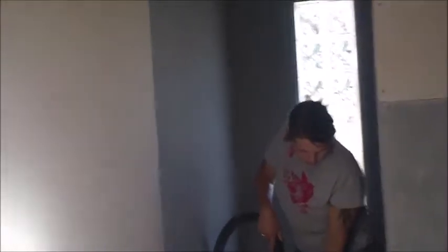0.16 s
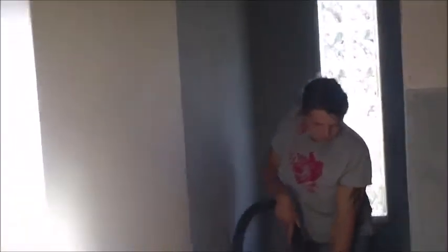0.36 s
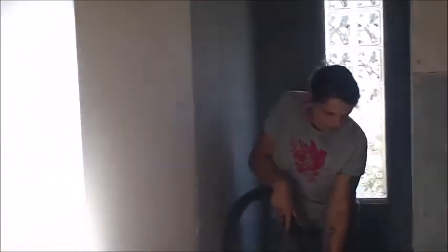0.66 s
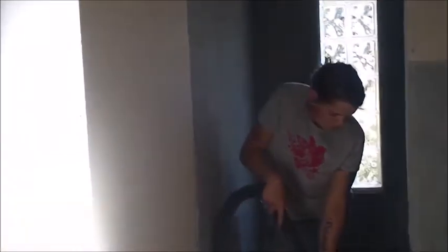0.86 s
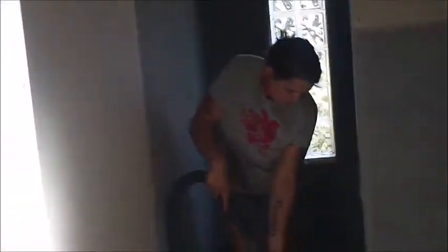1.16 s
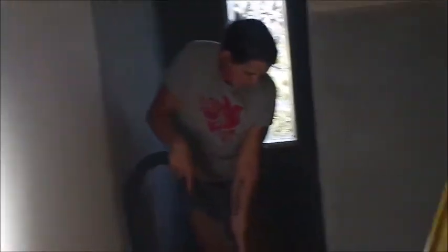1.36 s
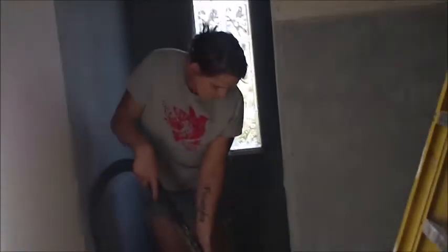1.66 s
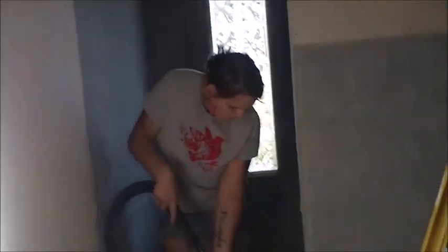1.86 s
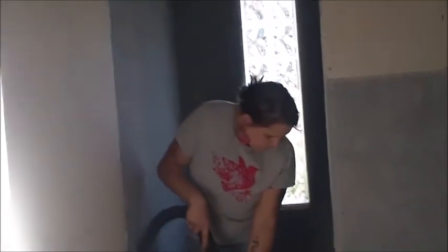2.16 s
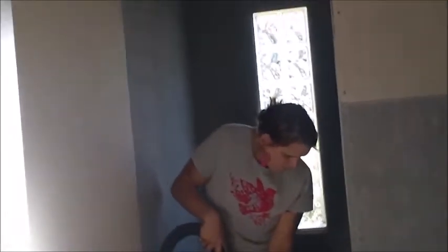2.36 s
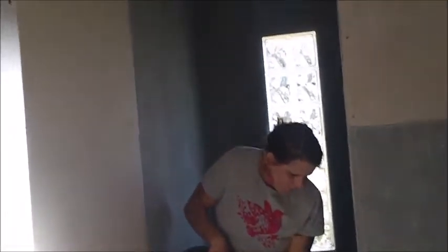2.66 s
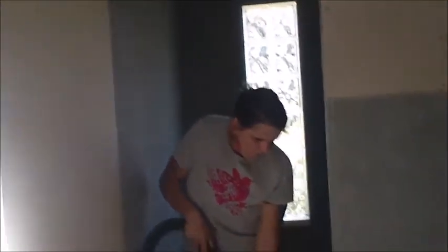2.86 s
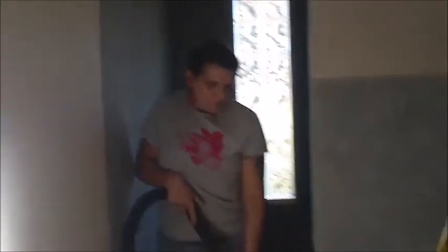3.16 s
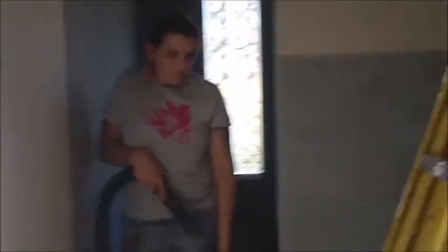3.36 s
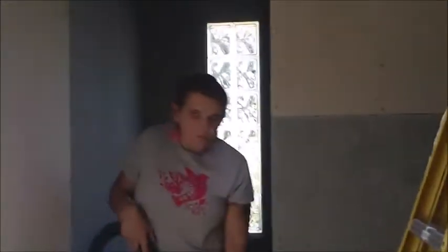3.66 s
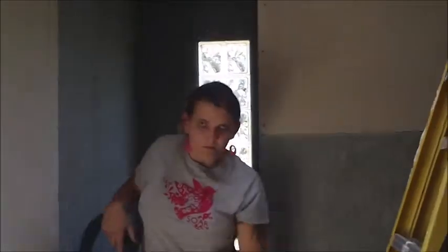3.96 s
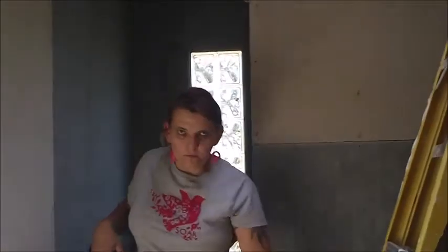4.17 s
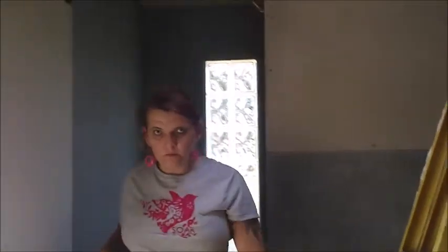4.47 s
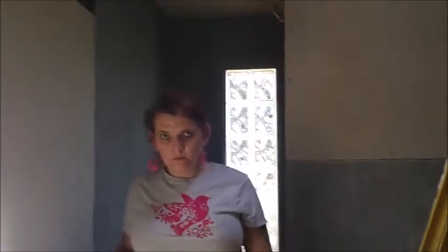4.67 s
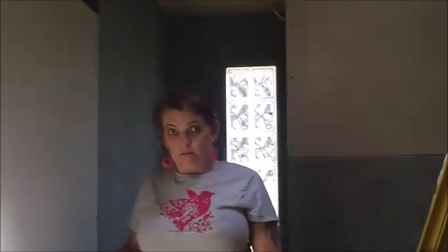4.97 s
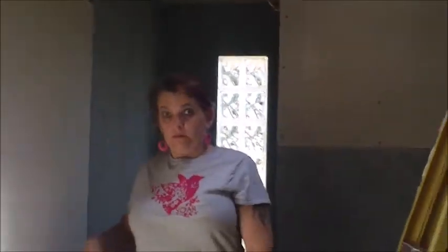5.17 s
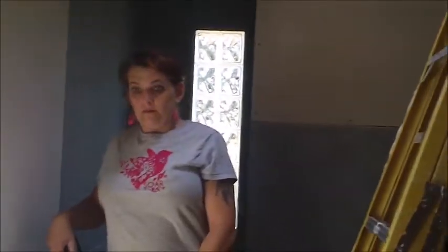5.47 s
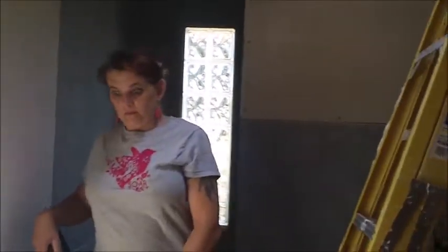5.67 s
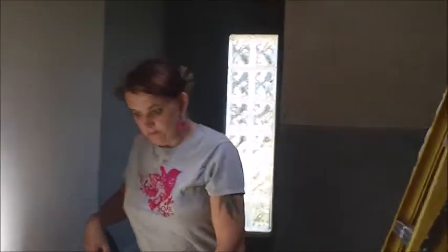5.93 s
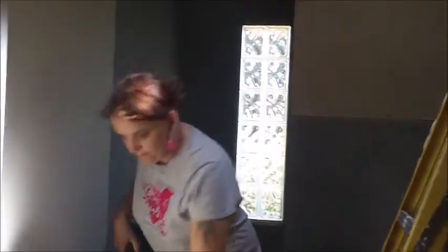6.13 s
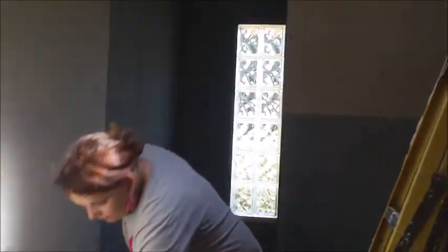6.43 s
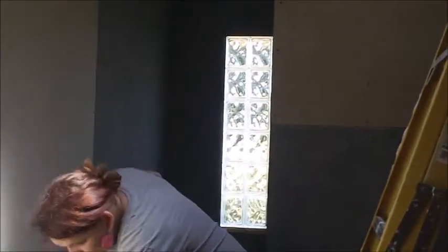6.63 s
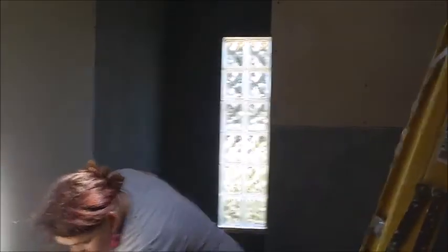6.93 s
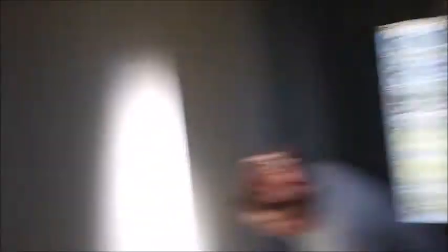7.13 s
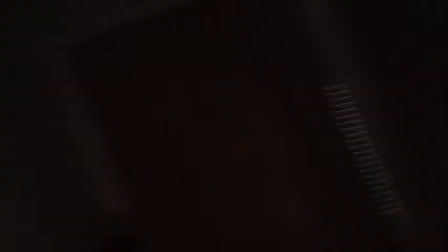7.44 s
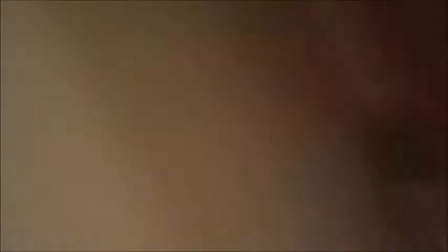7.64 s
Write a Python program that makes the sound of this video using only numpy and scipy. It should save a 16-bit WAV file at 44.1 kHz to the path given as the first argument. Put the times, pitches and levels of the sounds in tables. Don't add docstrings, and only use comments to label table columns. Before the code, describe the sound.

A canister vacuum cleaner runs in a bare, hard-walled room, heard close on a handheld microphone that moves around. A steady singing whine stays at one pitch, wavering in loudness, over roaring, hissing air. A sharp grit knock cracks in the hose midway. Near seven seconds the motor is switched off and the whine slides down, swelling and dipping, while air still rushes.

```python
import sys
import numpy as np
from scipy import signal
from scipy.fft import rfft, irfft, next_fast_len
from scipy.io import wavfile
from scipy.ndimage import uniform_filter1d, map_coordinates

SR = 44100
rng = np.random.default_rng(int(sys.argv[2]) if len(sys.argv) > 2 else 0)


def transcribe(signal):
    frames = np.atleast_2d(signal).T
    limited = np.clip(frames, -1, 1)
    pcm = np.round(limited * 32767).astype(np.int16)
    wavfile.write(sys.argv[1], SR, pcm)


def volts(x):
    e = np.asarray(x, float) / 20
    return 10 ** e


N = 343980

# time_s, level_db
SHAFT_TONE = [(0, -11.5), (.27, -15.5), (.44, -28), (.57, -22.5), (.68, -29), (.86, -15), (1.08, -10.5),
              (2.0, -11), (2.34, -12.5), (3.2, -14), (3.65, -10.5), (3.87, -10.5), (4.21, -12.5),
              (4.55, -10.5), (5.24, -9), (5.46, -9.5), (5.9, -8.6), (6.85, -8.4)]
# swell_s, swell_db, since_null_s, null_db
CROSSED = [(6.941, -7.5, 0.014, -26), (6.975, -13, 0.012, -17.0), (7.026, -13, 0.03, -39),
           (7.097, -9, 0.057, -23.5), (7.135, -12, 0.008, -16), (7.165, -14.5, 0.0089, -32),
           (7.211, -14, 0.037, -36), (7.291, -7.5, 0.044, -22), (7.328, -9.0, 0.026, -15),
           (7.391, -11.5, 0.028, -23), (7.44, -12.5, 0.031, -35), (7.52, -18.5, 0.034, -30),
           (7.581, -16, 0.047, -34), (7.635, -19, 0.032, -35), (7.708, -14.0, 0.066, -25)]
# time_s, level_db
LAST_SWELLS = [
    (7.743, -18),
    (7.79, -11.5),
    (7.81, -8),
]
# order (multiple of the shaft tone), level_db
FAINT_ORDERS = [(6, -51), (14, -53), (21, -63)]
# centre_s, length_s, level_db
SECOND = [(.65, .5, -30), (2.2, 1, -33), (3.0, .5, -32), (3.85, .5, -30.5), (4.4, 0.43, -23),
          (5.0, 0.76, -33), (6.65, 0.55, -43)]
THIRD = [(.1, 0.58, -29), (.48, .3, -32), (1.2, 1.1, -34), (2.6, 0.95, -35), (3.6, 0.64, -42),
         (4.45, 0.74, -31.5), (5.15, 0.67, -38.5), (6.3, .5, -41)]
FOURTH = [(.95, 0.44, -45), (3.1, .7, -45), (4.3, .8, -36), (5.4, 1.0, -44), (6.7, .4, -51)]
FIFTH = [(.7, 0.76, -35), (1.7, .8, -50), (2.7, 0.99, -42), (3.45, 0.32, -38), (4.05, 0.54, -43),
         (5.1, 0.94, -48)]
BLADES = [(.62, .25, -33.5), (1.15, 0.59, -43), (1.72, 0.87, -34), (2.72, 0.48, -35), (4.37, 0.38, -36.5),
          (5.55, 0.43, -40), (6.05, 0.21, -44), (6.7, 0.28, -50)]
# centre_s, length_s, level_db
GLIDES = [
    [(7.1, .3, -34), (7.27, .15, -42)],
    [(7.133, 0.34, -33.5)],
    [(7.2, .1, -35), (7.33, .12, -41), (7.47, .13, -35), (7.61, .13, -36)],
]

# freq_hz, density_db (per Hz)
ROAR = [(400, -16.5), (470, -6), (560, -6), (720, -5.5), (850, 3), (1070, -4), (1450, -5), (1600, -14),
        (1900, -43)]
THROAT = [(1400, -17), (1600, -3), (2200, -2), (2700, -6.5), (3300, -6), (3900, -10), (4300, -44)]
HISS = [(3200, -27), (3900, -5.5), (4600, -1.5), (5300, -1.5), (6200, -1.5), (7200, -2.5), (8000, -3.5),
        (8400, -55)]
FIZZ = [(7600, -32), (8000, -2), (9200, -2), (10500, -4.5), (11200, -11), (11600, -42)]
SPRAY = [(10800, -32), (11200, -1.5), (12000, -2.5), (13500, -5.5), (15500, -6)]
NOZZLE = [(4300, -30), (4600, -4), (4950, -24), (5400, -11), (5750, 1), (6100, -5), (6500, -28)]
# freq_hz, density_db (per Hz)
BOOM = [(180, -29), (215, -6), (270, -4), (330, -8.5), (440, -10), (520, -3)]
RUMBLE = [(18, -42), (35, -20), (70, -22), (120, -10.5), (190, -4), (230, -18)]
# freq_hz, width_hz, lift_db
HOSE = [(175, 29, 5.5), (246.5, 29, 10.5), (275.6, 13, 9), (363, 52, 7), (390, 24, 2.5), (723.7, 42, 9),
        (850, 67, -3.5), (1398, 75, 8), (1667, 20, 4), (2690, 49, 7)]
# time_s, level_db
AIR_LEVEL = [(.1, -25.5), (.37, -21), (.79, -20), (.88, -22.5), (1.15, -25.5), (1.75, -26), (2.35, -24),
             (2.5, -22.5), (3.3, -23), (3.6, -25), (3.95, -24), (4.25, -23), (4.6, -26.5), (5.1, -27.5),
             (5.55, -28), (5.95, -30.5), (6.9, -30), (7.8, -29)]

# start_s, peak_db, ring_hz, t60_s
KNOCKS = [
    (3.8631, -2, 850, .005),
    (3.8631, -9, 2000, .008),
    (7.6545, -7, 1220, .016),
    (7.6545, -16, 1800, .008),
]
# centre_s, length_s, centre_hz, width_hz, level_db
BRUSH = [
    (7.398, 0.058, 10300, 5000, -29.5),
    (7.585, .06, 10400, 500, -37),
    (7.769, 0.069, 10300, 700, -41),
    (.32, .06, 60, 80, -50),
    (3.178, 0.1, 110, 80, -44),
    (4.43, .04, 60, 100, -42),
    (5.727, 0.085, 90, 60, -49),
    (7.498, 0.058, 70, 80, -47),
    (7.659, .05, 90, 100, -48),
]

# start_s, depth_db, recovery_s
DUCKS = [
    (2.025, -2, .1),
    (2.53, -1.5, .15),
    (3.864, -4, .2),
    (4.35, -3, .04),
]
# freq_hz, width_hz
NOTCHES = [(7881, 680), (10960, 340)]
# centre_s, above_hz, depth_db
DROPOUTS = [
    (1.167, 2700, -20),
    (2.106, 1600, -24),
    (3.38, 1600, -22),
    (4.367, 2500, -22),
    (4.409, 2500, -22),
    (4.473, 2500, -18),
    (5.772, 1500, -24),
]
# centre_s, centre_hz
REFILLED = [(.26, 5200), (.261, 11700), (.354, 11000), (.422, 9000), (.679, 9650), (.958, 13050),
            (1.329, 9600), (1.422, 12900), (1.514, 10700), (1.747, 5150), (2.142, 9000), (2.374, 7500),
            (2.699, 9600), (2.768, 6300), (2.769, 11750), (2.885, 10350), (3.187, 14400), (3.698, 8950),
            (4.975, 10250), (5.23, 9000), (5.439, 4900), (5.439, 8400), (5.67, 14100), (5.671, 11750),
            (5.88, 4900), (6.02, 13050), (6.693, 8300), (6.693, 5200), (6.738, 13350), (7.367, 4900)]

RUN_HZ, OFF_S, COAST_S = 496.85, 6.887, 2.2
QUIET_DB, GLIDE_DB = -48, -53
MEAN_AIR_DB = -26
LIFT_S, LIFT_DB = 5.25, -9
# level_db at mean air level, db per db of air level, db per halving of speed
ROAR_LAW, THROAT_LAW, HISS_LAW = (-23.5, 1.04, -1.3), (-30.5, 1.2, 5.1), (-28.5, 0.93, -2.8)
FIZZ_LAW, SPRAY_LAW = (-33.5, 0.85, -2.2), (-38.5, 1, -7)
DRUM_LAW, FLOOR_LAW = (-30, 1, -2.7), (-45, 1.35, -7)


def unit(x):
    return x / np.sqrt(np.mean(x ** 2) + 1e-20)


def along(points, hz):
    f, v = np.transpose(points)
    return np.interp(np.log(hz + 1), np.log(f + 1), v, left=-120, right=-120)


def curves(rows):
    s, *cols = np.transpose(rows)
    return [np.interp(np.arange(N) / SR, s, c) for c in cols]


def wobble(rate):
    coarse = np.arange(0, N + 64, 64)
    knots = rng.standard_normal(int(N * rate / SR) + 4)
    return np.interp(np.arange(N), coarse, map_coordinates(knots, [coarse * rate / SR]))


def filtered(x, response):
    m = next_fast_len(x.shape[-1] + 8192)
    spectrum = rfft(x, m) * response(np.fft.rfftfreq(m, 1 / SR))
    return irfft(spectrum, m)[..., :x.shape[-1]]


def span(s, length):
    first = max(round((s - length / 2) * SR), 0)
    window = np.hanning(round(length * SR))[:N - first]
    return slice(first, first + len(window)), window


def patched(x, depth_db, size, tall, long):
    z = signal.stft(x, nperseg=size)[2]
    field = uniform_filter1d(rng.standard_normal(z.shape), tall, axis=0)
    field = uniform_filter1d(field, long, axis=1)
    return signal.istft(z * volts(depth_db * unit(field)), nperseg=size)[1][:N]


def room(x, t60):
    t = np.arange(SR // 2) / SR
    tail = rng.standard_normal(len(t)) * volts(-60 * t / t60)
    return signal.fftconvolve(x, tail / np.linalg.norm(tail))[:N]


def speed():
    since = np.arange(N) / SR - OFF_S
    hz = RUN_HZ / (1 + np.clip(since, 0, None) / COAST_S) ** 2
    return uniform_filter1d(hz, size=1500), since < 0


def follows(law):
    db, per_level, per_halving = law
    halvings = np.log2(RUN_HZ / speed()[0])
    return db + per_level * (curves(AIR_LEVEL)[0] - MEAN_AIR_DB) + per_halving * halvings


def rush(spectrum, patchy_db):
    noise = patched(rng.standard_normal(N), patchy_db, size=512, tall=6, long=10)

    def response(f):
        lift_db = sum(db / (1 + (2 * (f - hz) / width) ** 2) for hz, width, db in HOSE)
        return volts(along(spectrum, f) + lift_db)

    return unit(filtered(noise, response))


def drum():
    boom = volts(follows(DRUM_LAW) + 0.42 * wobble(5)) * rush(BOOM, patchy_db=0.4)
    rumble = volts(follows(FLOOR_LAW) + 0.66 * wobble(5)) * rush(RUMBLE, patchy_db=0.5)
    return boom + rumble


def air():
    flutter = 0.5 * wobble(16) + 0.64 * wobble(45)
    roar = volts(follows(ROAR_LAW) + 0.4 * wobble(16)) * rush(ROAR, patchy_db=0.37)
    throat = volts(follows(THROAT_LAW) + 0.63 * flutter) * rush(THROAT, patchy_db=0.6)
    hiss = volts(follows(HISS_LAW) + 1.1 * flutter) * rush(HISS, patchy_db=0.58)
    fizz = volts(follows(FIZZ_LAW) + 0.57 * flutter) * rush(FIZZ, patchy_db=0.84)
    spray = volts(follows(SPRAY_LAW) + 1.0 * flutter) * rush(SPRAY, patchy_db=0.5)
    return roar + throat + hiss + fizz + spray


def nozzle():
    lifted = np.clip((np.arange(N) / SR - LIFT_S) / 0.15, 0, 1)
    level_db = follows(HISS_LAW) + LIFT_DB + 1.5 * wobble(3)
    return lifted * volts(level_db) * rush(NOZZLE, patchy_db=2.5)


def grit():
    out, t = np.zeros(N), np.arange(SR // 40) / SR
    for s, db, hz, t60 in KNOCKS:
        out[round(s * SR):][:len(t)] += volts(db - 60 * t / t60) * np.sin(2 * np.pi * hz * t)
    return signal.sosfilt(signal.butter(2, 250, "high", fs=SR, output="sos"), out)


def fingers():
    out = np.zeros(N)
    for s, length, hz, width, db in BRUSH:
        where, window = span(s, length)
        noise = rng.standard_normal(len(window))
        band = filtered(noise, lambda f: np.exp(-(2 * (f - hz) / width) ** 2))
        out[where] += volts(db) * window * unit(band)
    return out


def zones(rows, quiet_db):
    t = np.arange(0, N / SR, 0.01)
    swells = sum(volts(db) * np.exp(-(2 * (t - s) / length) ** 2) for s, length, db in rows)
    gain = volts(quiet_db) + swells
    return curves(np.transpose([t, 20 * np.log10(gain)]))[0]


def order(k, db, turn):
    phase = k * turn + 0.12 * wobble(7.7) + 2 * np.pi * rng.random()
    return volts(db + 1.0 * wobble(14)) * np.sin(phase)


def shaft_tone(turn, powered):
    knots, sign = [(OFF_S, volts(SHAFT_TONE[-1][1]))], 1
    for s, db, since, null_db in CROSSED:
        deep = null_db < -23
        sign = -sign if deep else sign
        knots.append((s - since, 0 if deep else sign * volts(null_db)))
        knots.append((s, sign * volts(db)))
    knots += [(s, sign * volts(db)) for s, db in LAST_SWELLS]
    falling = uniform_filter1d(curves(knots)[0], size=330)
    steady = volts(curves(SHAFT_TONE)[0] + 0.34 * wobble(12))
    return np.where(powered, steady, falling) * np.sin(turn)


def rotor():
    hz, powered = speed()
    turn = 2 * np.pi * np.cumsum(hz) / SR
    tone = shaft_tone(turn, powered)
    on = uniform_filter1d(1. * powered, size=3000)
    loud = [zones(rows, QUIET_DB) for rows in (SECOND, THIRD, FOURTH, FIFTH, BLADES)]
    levels = list(zip((2, 3, 4, 5, 7), loud)) + list(FAINT_ORDERS)
    held = sum(order(k, db, turn) for k, db in levels)
    gliding = np.zeros(N)
    for k, rows in zip((2, 3, 7), GLIDES):
        gliding += volts(1 + 2.5 * wobble(30)) * order(k, zones(rows, GLIDE_DB), turn)
    direct = tone + on * held + volts(-8) * (1 - on) * gliding
    echoes = room((1 - on) * (volts(-1) * gliding + volts(-17) * tone), t60=0.6)
    return np.sqrt(2) * (direct + echoes)


def scene():
    flow = patched(drum() + air(), 2.1, size=4096, tall=2, long=9)
    flow = patched(flow, 0.7, size=1024, tall=5, long=40)
    mono = flow + nozzle() + grit() + fingers() + rotor()
    return np.tile(mono, (2, 1))


def gain_control(x):
    t = np.arange(N) / SR
    duck_db = np.zeros(N)
    for s, db, recovery in DUCKS:
        duck_db += db * np.exp(-np.abs(t - s) / recovery) * np.clip((t - s) / 0.0024, 0, 1)
    x = x * volts(duck_db)
    return x / (1 + np.abs(x / 1.05) ** 8) ** (1 / 8)


def microphone(x):
    def response(f):
        notch = np.prod([(c * c - f * f) / (c * c - f * f + 1j * f * w) for c, w in NOTCHES], axis=0)
        return notch ** 2 * (f < 15310)

    return filtered(x, response)


def drop_treble(x):
    for s, hz, db in DROPOUTS:
        where, window = span(s, 0.031)
        kept = rng.random(128) < np.where(np.arange(128) < 42, 0.28, 0.04)
        lost = lambda f: (f > hz) & ~kept[(f // 175).astype(int)]
        x[:, where] -= (1 - volts(db)) * window * filtered(x[:, where], lost)
    return x


def refill_bands(x):
    width_hz, length_s, level_db = 1600, 0.055, -0.5
    for s, hz in REFILLED:
        where, window = span(s, length_s)
        size = len(window)
        band = lambda f: np.abs(f - hz) < width_hz / 2
        noise = filtered(rng.standard_normal((2, 3 * size)), band)
        fresh = unit(noise)[:, size:2 * size]
        old = filtered(x[:, where.start - 500:where.stop + 500], band)[:, 500:-500]
        removed = (1 - np.sqrt(1 - window ** 2)) * old
        x[:, where] += window * fresh * volts(level_db) * old.std() - removed
    return x


def top_cut(x):
    return signal.sosfilt(signal.butter(12, 15920, fs=SR, output="sos"), x)


def record(dry):
    mix = microphone(gain_control(dry))
    mix = refill_bands(drop_treble(mix))
    return top_cut(mix)


dry = scene()
out = record(dry)
transcribe(out)
```